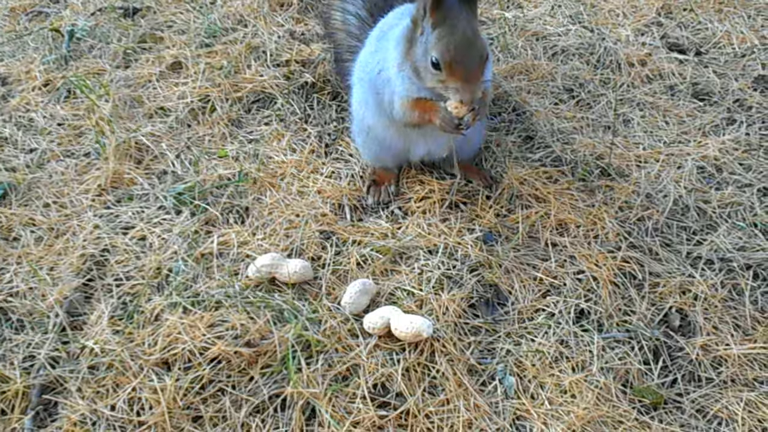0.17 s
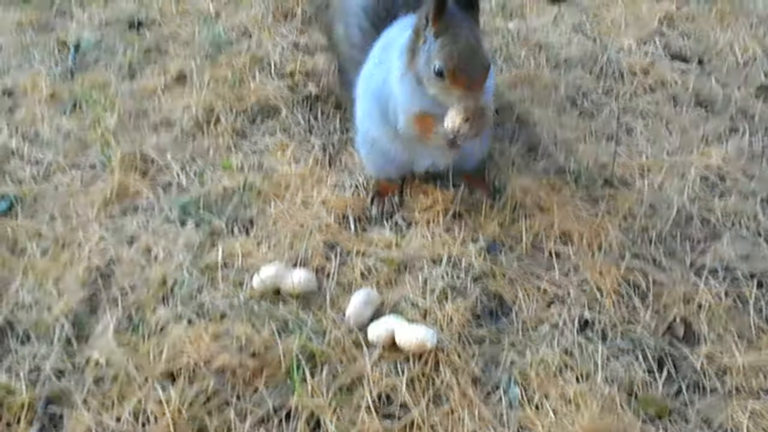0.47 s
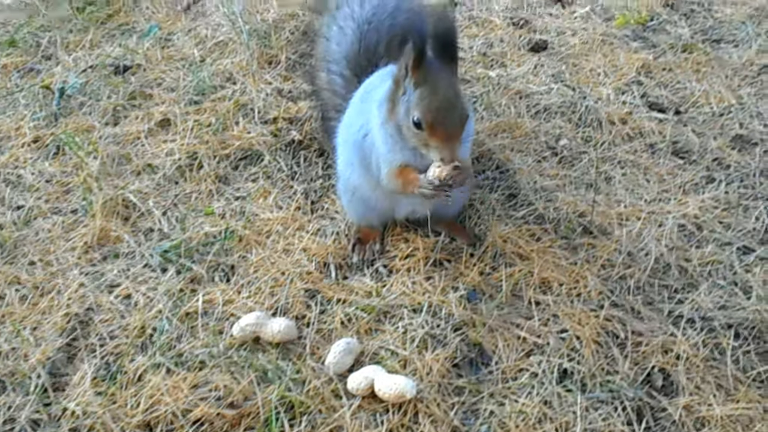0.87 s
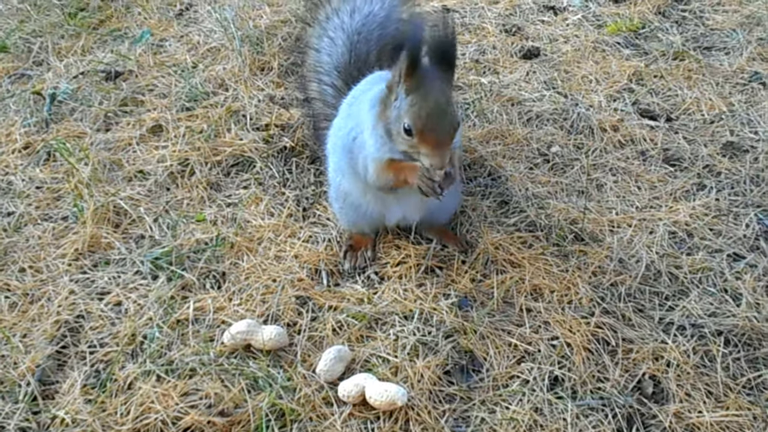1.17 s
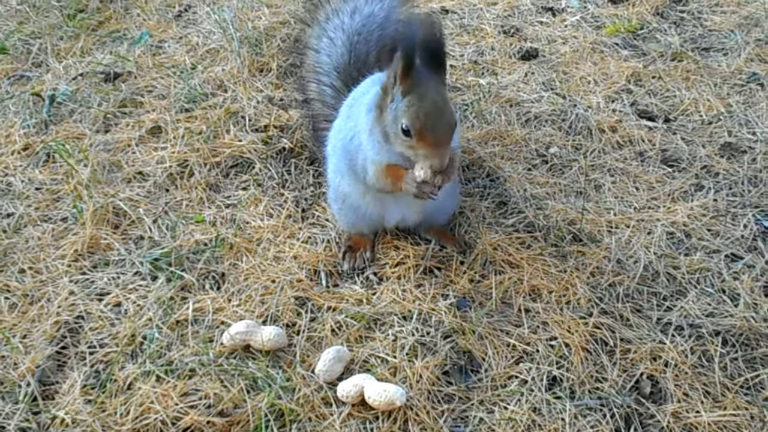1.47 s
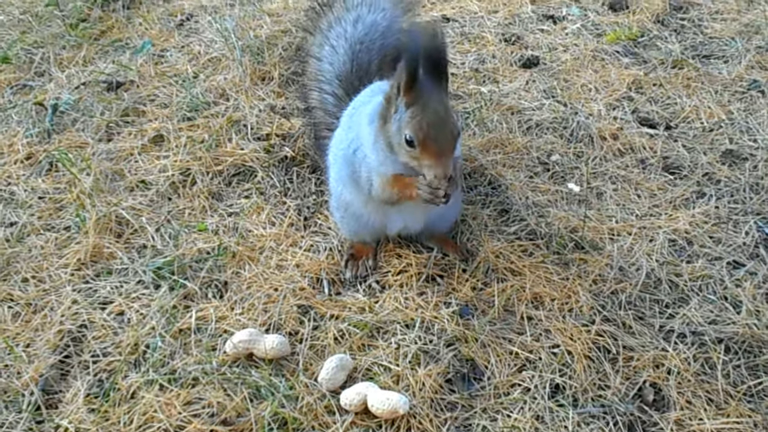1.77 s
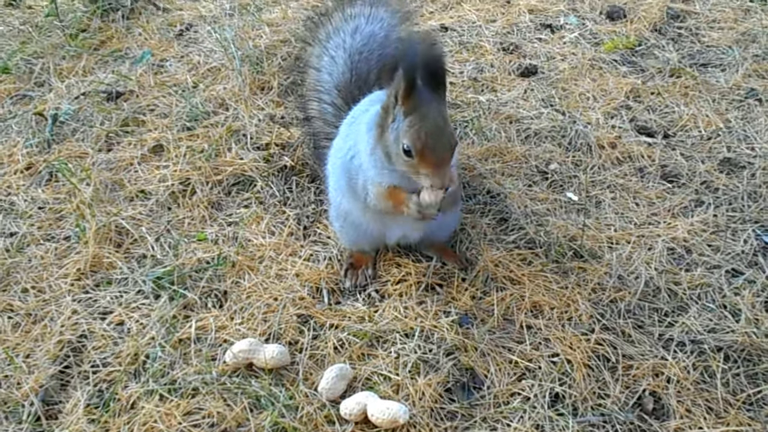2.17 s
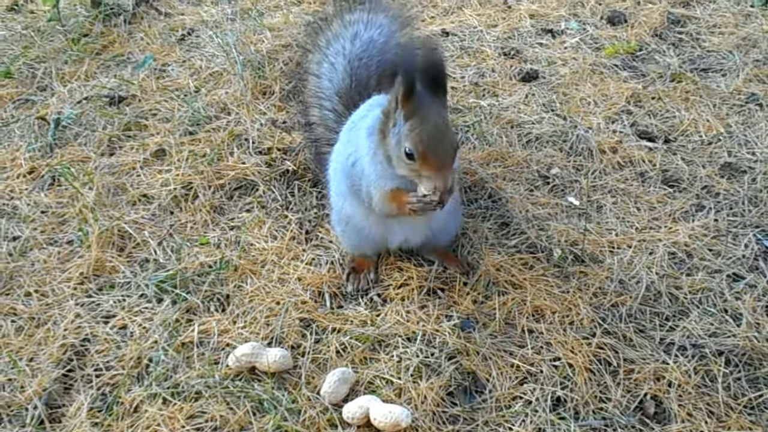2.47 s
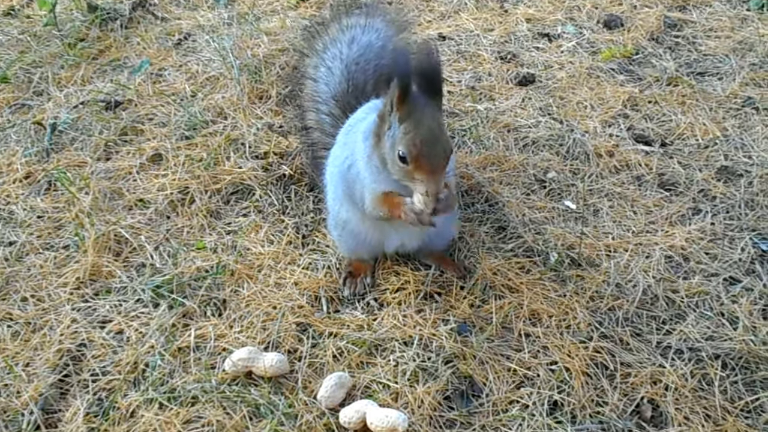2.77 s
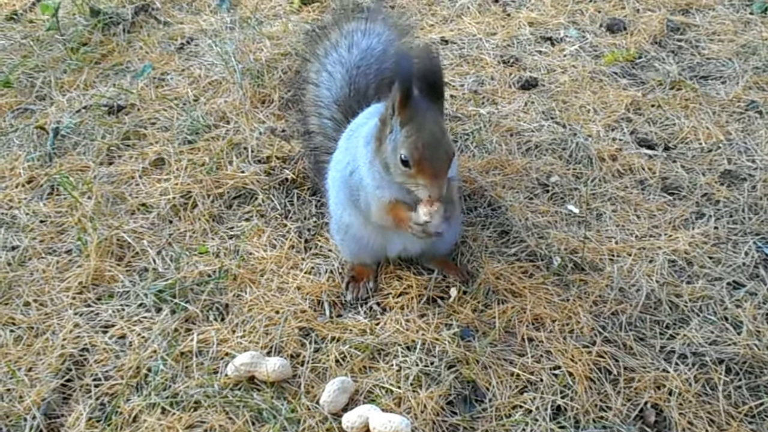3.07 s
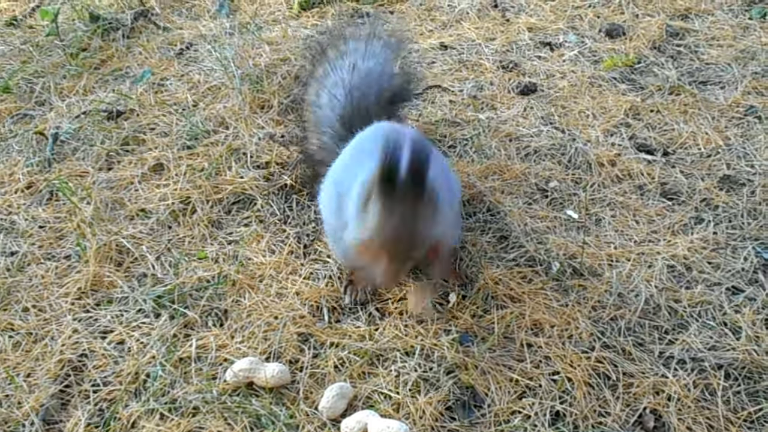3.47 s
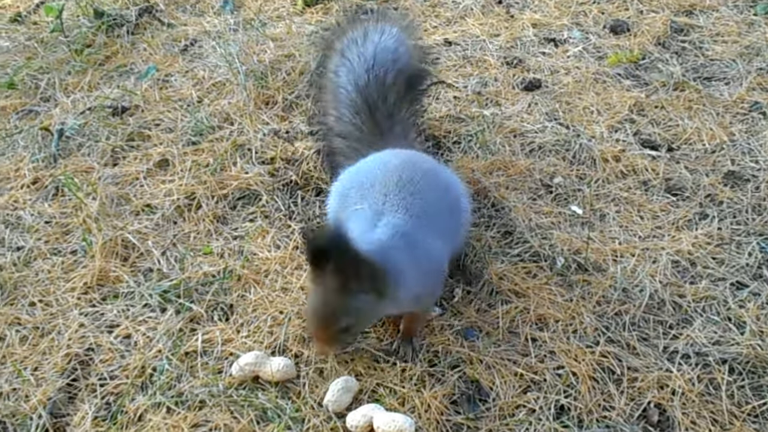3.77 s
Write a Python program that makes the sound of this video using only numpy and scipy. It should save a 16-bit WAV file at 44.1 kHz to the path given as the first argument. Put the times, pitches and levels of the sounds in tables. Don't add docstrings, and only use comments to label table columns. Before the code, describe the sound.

A squirrel gnaws a nut shell in crisp, bright irregular crackles over faint distant traffic.

```python
import sys
import numpy as np
from scipy import signal
from scipy.fft import rfft, irfft, next_fast_len
from scipy.io import wavfile
from scipy.ndimage import uniform_filter1d, map_coordinates

SR = 44100
rng = np.random.default_rng(int(sys.argv[2]) if len(sys.argv) > 2 else 0)


def master_out(mix):
    frames = np.transpose(np.atleast_2d(mix))
    ceiling = np.clip(frames, -1, 1)
    pcm = np.round(ceiling * 32767).astype(np.int16)
    wavfile.write(sys.argv[1], SR, pcm)


def nominal_scale(level):
    x = np.asarray(level, float) / 20
    return 10 ** x


N = 173313

# (time [s], ring level [dB], ring pitch [Hz], snap level [dB], edge level [dB])
EARLY_CRACKS = [(0.0965, -48, 3540, -45.0, -62.5), (0.2497, -33, 3550.0, -33.5, -36.5),
                (0.2539, -30.5, 3170, -31.5, -37), (0.39, -47.5, 2860, -44, -46.5),
                (0.505, -43, 2800.0, -44.5, -47), (0.5331, -25.5, 2850, -23, -30),
                (0.5427, -39.0, 2560, -49, -70), (0.55, -30.5, 2960, -61, -77.0),
                (1.2049, -41, 2930, -43.5, -49), (1.2104, -31.5, 2970, -29, -38),
                (1.2444, -22, 2910, -24, -40.5), (1.2568, -31, 2980, -35, -28),
                (1.265, -42, 3400, -52, -63.0), (1.2746, -36.5, 3020, -45, -53.0),
                (1.3089, -45.0, 4260.0, -43, -56), (1.3149, -34, 3130, -47, -61),
                (1.3182, -42, 2620, -50.5, -53), (1.383, -37, 3320, -41, -37),
                (1.3878, -30, 4240, -26, -35), (1.3901, -26, 3330, -28, -26.5),
                (1.3961, -40, 2860.0, -34, -37), (1.4638, -41.5, 3120.0, -44, -52),
                (1.517, -38, 3340.0, -35, -47), (1.5182, -29.5, 3190.0, -29, -33.0),
                (1.521, -30.5, 2700, -23.5, -36), (1.5273, -44, 3030, -45, -50),
                (1.5452, -27.5, 3330, -28.5, -48), (1.551, -35, 4200, -46, -54),
                (1.5531, -39, 3600.0, -41, -44), (1.5647, -31.5, 3150, -39.5, -44)]
LATE_CRACKS = [(1.8488, -30, 4560, -30, -35.5), (1.8571, -38, 3180, -46, -53.0),
               (1.9127, -38.5, 3400, -40.5, -59), (1.9178, -48, 4290.0, -48, -55),
               (1.9445, -42, 4290.0, -42.5, -50), (1.9554, -30.5, 3230, -30, -41.0),
               (1.9612, -32, 3300, -32, -42), (1.9709, -32.5, 4200, -19.5, -28.5),
               (1.9751, -36.5, 3250, -39, -47), (2.0856, -36.5, 3450, -43, -47),
               (2.1016, -26.5, 3320.0, -27.5, -43), (2.1069, -28.5, 3160, -58, -65.0),
               (2.1171, -42.5, 3100.0, -49, -59), (2.1982, -43, 3000, -56, -74),
               (2.4196, -24, 3260, -28.5, -23.5), (2.4239, -35, 3700.0, -34.5, -32),
               (2.4292, -42, 3400, -38, -54), (2.431, -33, 3600, -24, -29), (2.5225, -48.0, 3440, -47, -44),
               (2.5279, -36, 4290.0, -37, -58), (2.5329, -27.0, 3160, -26, -29.0),
               (2.5408, -29.5, 4010, -32.5, -36), (2.586, -27, 3190, -24.5, -38.5),
               (2.592, -42, 4290.0, -43, -51), (2.5944, -33.5, 4080, -34, -31.5),
               (2.6197, -44, 4160.0, -41.5, -51.0), (2.7763, -46, 2670.0, -46, -84.5),
               (3.0113, -37.5, 2800, -53, -70.5)]
EXTRA_CRACKS = [
    (1.3894, -27, 3100, -28, -36),
    (1.5433, -33, 3400, -33, -46),
    (1.5495, -44, 3600, -43, -44),
]
# (time [s], ring level [dB], snap level [dB])
EARLY_TICKS = [(0.0948, -75, -69.5), (0.106, -76, -68.5), (0.1192, -71, -61.0), (0.1234, -63, -53),
               (0.1274, -47, -54), (0.1427, -57, -54), (0.1824, -77, -70), (0.2149, -65, -54),
               (0.2178, -68.0, -59.5), (0.26, -56.5, -64.5), (0.2638, -78.5, -71), (0.2771, -59, -61),
               (0.3575, -51.5, -45), (0.395, -54, -61), (0.4605, -54.5, -74), (0.475, -54.5, -71),
               (0.498, -44, -54), (0.51, -70, -52), (0.5233, -49, -56), (0.5397, -51, -67),
               (0.5643, -73.5, -62), (0.7686, -53, -71.5), (0.948, -75.5, -62.5), (0.9502, -75.0, -58),
               (1.0217, -58.0, -61), (1.0329, -54, -78.5), (1.0555, -59, -70), (1.0579, -55.5, -70),
               (1.0653, -46.5, -56.5), (1.066, -56, -53), (1.0696, -49.5, -55), (1.144, -60, -63),
               (1.1803, -45.5, -48.5), (1.2217, -54, -48), (1.2276, -53.0, -51), (1.2495, -51, -50),
               (1.2616, -50, -39), (1.298, -52.0, -64), (1.3117, -49.0, -44)]
LATE_TICKS = [(1.3616, -51, -61), (1.467, -55, -55.5), (1.4688, -52.5, -50.5), (1.5058, -45.0, -50),
              (1.5553, -53.0, -44.5), (1.56, -50, -44), (1.595, -57.0, -49), (1.6165, -58, -65),
              (1.7425, -58, -55), (1.747, -57.0, -52.5), (1.7843, -57, -54), (1.7912, -70.5, -55.0),
              (1.7972, -64.0, -57.0), (1.808, -52, -51.0), (1.8267, -62, -51.0), (1.8283, -63, -49),
              (1.907, -59, -49), (1.98, -47, -61), (2.0586, -61.5, -51), (2.066, -53, -52),
              (2.0688, -60.0, -53.0), (2.0707, -50.0, -57.5), (2.078, -54.5, -50), (2.0827, -52, -43.5),
              (2.0883, -41, -52), (2.0915, -47, -51.5), (2.1246, -44, -55), (2.5134, -56.5, -50),
              (2.5265, -42, -43), (2.5315, -57, -50), (2.537, -49, -53), (2.5674, -50, -45),
              (2.5766, -42, -42), (2.778, -42.5, -62), (3.2825, -69, -58), (3.578, -61, -55),
              (3.5813, -59, -50), (3.5834, -66, -58), (3.5876, -64, -57)]
# (frequency [Hz], level [dB])
SNAP_MODES = [(4900, 1), (5900, 3), (7300, 6.5)]
# (low [Hz], high [Hz])
CRACK_BANDS = [(1800, 4600), (4000, 8200), (8200, 13000)]
# (time [s], level [dB], pitch [Hz])
SHELL_SPLITS = [
    (.2541, -32, 1750),
    (2.4192, -27, 1400),
    (2.4303, -29, 1000),
]
# (frequency [Hz], gain [dB])
SHELL_RADIATION = [(400, -30), (1500, 0)]
# (time [s], level [dB])
NIBBLE_LEVEL = [(.07, -67), (.5, -63.5), (.62, -68), (1.0, -73), (1.3, -57), (1.62, -70), (1.68, -78),
                (1.8, -62.5), (2.1, -53.5), (2.25, -75), (2.55, -65), (2.7, -72), (3.2, -64.5), (3.93, -63)]
# (time [s], swell length [s], level [dB])
PAW_RUSTLES = [
    (0.76, 0.014, -64.5),
    (1.748, 0.005, -62),
    (3.159, 0.016, -59),
    (3.345, 0.0089, -62),
    (3.508, 0.018, -67),
    (3.582, 0.0072, -59),
]
# (frequency [Hz], gain [dB])
GRASS_COLOUR = [(1500, -17), (2500, 1), (5000, -1.5), (9500, -11), (12000, -7)]
# (time [s], level [dB])
TRAFFIC_LEVEL = [(0, -52.5), (1, -53), (2, -51), (3, -50.5), (3.93, -50)]
# (frequency [Hz], gain [dB])
HUM_COLOUR = [(20, -49), (260, -7), (600, -5), (1000, -1), (1600, -8), (2100, -21.5), (4400, -31.5),
              (13000, -48)]
# (time [s], level [dB])
PASSING_LEVEL = [
    (0, -85),
    (1.2, -72.5),
    (1.9, -66.5),
    (2.15, -64),
    (2.3, -58),
    (2.55, -60.5),
    (2.85, -60),
    (3.12, -61),
    (3.4, -68),
    (3.93, -66),
]
# (frequency [Hz], gain [dB])
TYRE_COLOUR = [(900, -17), (1500, 1.5), (4500, -3), (8000, -15.5), (13000, -26)]
# (frequency [Hz], gain [dB])
WIND_COLOUR = [(15, -5), (60, -2.5), (200, 1), (500, -35.5)]
# (frequency [Hz], gain [dB])
MIC_RESPONSE = [(9700, 0), (10200, -8), (10600, -38), (11900, -21), (12700, -42), (14000, -66)]

RING_T60_S, RING_RISE_S, SNAP_T60_S, SNAP_RISE_S = 0.0048, 0.0002, 0.003, 0.0001
RING_DB, SNAP_DB, EDGE_DB, THUD_DB = -1.5, -2, 0.5, -20
TICK_HZ, TICK_EDGE_DB, TICK_DB, TICK_T60_S = 3180, -7.5, -2, 0.0071
EDGE_HZ = 9940
CRUMBLE_DB, CRUMBLE_T60_S = -9, 0.012
LEAD_S = 0.0006
DULLING = 0.2
CLICK, SCATTER_DB = 4, 2.5
BIRD_S, BIRD_LEN_S, BIRD_DB = 2.916, 0.158, -66.5
BIRD_END_HZ, BIRD_FALL_HZ, BIRD_FALL_S, BIRD_SAG_HZ_PER_S = 6810, 480, 0.018, 2750
TYRE_SWAY_DB, WIND_DB, HISS_DB = 1.2, -69.5, -98.5
OPEN_S, OPEN_DB, SETTLE_S = 0.0732, -13, 0.18
OPEN_STEP, OPEN_STEP_S = 0.002, 0.001


def cracks():
    ticks = [(s, db, TICK_HZ * (1 + 0.092 * rng.standard_normal()), snap_db, snap_db + TICK_EDGE_DB)
             for s, db, snap_db in EARLY_TICKS + LATE_TICKS]
    events = np.array(EARLY_CRACKS + LATE_CRACKS + EXTRA_CRACKS + ticks)
    s, ring_db, hz, snap_db, edge_db = events.T[:, :, None]
    t = np.arange(1536) / SR
    luck = rng.standard_normal((len(s), 12))
    noise = rng.standard_normal((4, len(s), len(t)))
    grain = nominal_scale(TICK_DB - 60 * t / TICK_T60_S) * noise
    contact = CLICK * (t == 0)

    thud_hz = 1500 * (1 + 0.14 * luck[:, 10:11])
    thud = nominal_scale(THUD_DB + 2 * luck[:, 9:10]) * ring(t, thud_hz, RING_T60_S, RING_RISE_S)
    body = ring(t, hz, RING_T60_S, RING_RISE_S) + 0.5 * grain[0] + thud + contact

    blunt_db = DULLING * np.minimum(edge_db - snap_db, 0)
    snap = 1.3 * nominal_scale(2 * blunt_db) * grain[1] + nominal_scale(blunt_db) * contact
    for k, (mode_hz, db) in enumerate(SNAP_MODES):
        mode_gain = nominal_scale(db + k * blunt_db + SCATTER_DB * luck[:, k:k + 1])
        tuned_hz = mode_hz * (1 + 0.073 * luck[:, k + 4:k + 5])
        snap = snap + mode_gain * ring(t, tuned_hz, SNAP_T60_S, SNAP_RISE_S)

    edge_hz = EDGE_HZ * (1 + 0.04 * luck[:, 3:4])
    edge = 1.14 * grain[2] + ring(t, edge_hz, SNAP_T60_S, SNAP_RISE_S)

    levels = nominal_scale([ring_db + RING_DB, snap_db + SNAP_DB, edge_db + EDGE_DB])
    blow = sum(g * banded(part, band) for g, part, band in zip(levels, [body, snap, edge], CRACK_BANDS))
    grit = nominal_scale(4 * np.repeat(rng.standard_normal((len(s), 48)), 32, 1))
    crumbs = sum(g * banded(noise[3], band) for g, band in zip(levels, CRACK_BANDS))
    tail = crumbs * nominal_scale(CRUMBLE_DB - 60 * t / CRUMBLE_T60_S) * grit
    return laid(s[:, 0] - LEAD_S, blow + tail)


def splits():
    s, db, hz = np.transpose(SHELL_SPLITS)[:, :, None]
    return laid(s[:, 0], nominal_scale(db) * ring(np.arange(512) / SR, hz, RING_T60_S, RING_RISE_S))


def nibbling(count=700):
    luck = rng.random((count, 3))
    t = np.arange(128) / SR
    s = luck[:, 0] * (N - 1) / SR
    strength_db = curve(NIBBLE_LEVEL)[(s * SR).astype(int)]
    size = nominal_scale(strength_db - 4.4 * np.log(luck[:, 1] + 0.12))[:, None]
    grit = np.diff(rng.standard_normal((count, len(t))), prepend=0) * nominal_scale(-60 * t / TICK_T60_S)
    hz = 2500 * 3.2 ** luck[:, 2:] ** 2
    return laid(s, size * (ring(t, hz, 0.0051, 0.0001) + 0.21 * grit))


def rustles():
    t = np.arange(N) / SR
    swell = sum(nominal_scale(db) * np.exp(-0.5 * ((t - s) / length) ** 2) for s, length, db in PAW_RUSTLES)
    return swell * unit(nominal_scale(2.6 * wobble(400)) * rush(GRASS_COLOUR, patchy_db=0.0))


def bird():
    t = np.clip(np.arange(N) / SR - BIRD_S, 0, BIRD_LEN_S)
    drop_hz = BIRD_FALL_HZ * np.exp(-t / BIRD_FALL_S)
    hz = BIRD_END_HZ + drop_hz + BIRD_SAG_HZ_PER_S * (BIRD_LEN_S - t)
    swell = np.abs(np.sin(np.pi * np.sqrt(t / BIRD_LEN_S))) ** 0.4 * (t < BIRD_LEN_S)
    return nominal_scale(BIRD_DB + wobble(60)) * swell * np.sin(2 * np.pi * np.cumsum(hz) / SR)


def traffic():
    hum_db = curve(TRAFFIC_LEVEL) + 0.12 * wobble(3.53) + 0.53 * wobble(9.5)
    hum = nominal_scale(hum_db) * rush(HUM_COLOUR, patchy_db=-0.68)
    tyre_db = curve(PASSING_LEVEL) + TYRE_SWAY_DB * wobble(5.73)
    return hum + nominal_scale(tyre_db) * rush(TYRE_COLOUR, patchy_db=0.6)


def wind():
    return nominal_scale(WIND_DB + wobble(2.2)) * rush(WIND_COLOUR, patchy_db=-0.5)


def ring(t, hz, t60, rise):
    shape = nominal_scale(-60 * t / t60) * (1 - np.exp(-t / rise))
    return shape / shape.max() * np.sin(2 * np.pi * hz * t)


def banded(rows, edges):
    rows = signal.sosfilt(signal.butter(3, edges, "bandpass", fs=SR, output="sos"), rows)
    return rows / np.sqrt(uniform_filter1d(rows ** 2, size=24, axis=1).max(1, keepdims=True))


def laid(times, rows):
    at = np.round(times * SR).astype(int)[:, None] + np.arange(rows.shape[1])
    return np.bincount(at.ravel(), rows.ravel(), N + SR)[:N]


def unit(x):
    return x / np.sqrt(np.mean(x ** 2) + 1e-20)


def curve(rows):
    return np.interp(np.arange(N) / SR, *np.transpose(rows))


def wobble(rate):
    knots = rng.standard_normal(int(N * rate / SR) + 4)
    return map_coordinates(knots, [np.arange(N) * rate / SR])


def coloured(x, points, causal=False):
    m = 2 * next_fast_len(N // 2 + 4096)
    f, v = np.transpose(points)
    log_hz = np.log(np.fft.rfftfreq(m, 1 / SR) + 1)
    gain = np.interp(log_hz, np.log(f + 1), v) * np.log(10) / 20
    if causal:
        cepstrum = irfft(gain, m)
        gain = rfft(cepstrum * np.r_[1, np.full(m // 2 - 1, 2), 1, np.zeros(m // 2 - 1)])
    return irfft(rfft(x, m) * np.exp(gain), m)[:N]


def rush(points, patchy_db):
    z = signal.stft(rng.standard_normal(N + 512), nperseg=512)[2]
    field = uniform_filter1d(uniform_filter1d(rng.standard_normal(z.shape), 8, 0), 10, 1)
    noise = signal.istft(z * nominal_scale(patchy_db * unit(field)), nperseg=512)[1][:N]
    return unit(coloured(noise, points))


def scene():
    t = np.arange(N) / SR - OPEN_S
    rise = nominal_scale(OPEN_DB * np.exp(-(np.abs(t) / SETTLE_S) ** 2))
    shell = coloured(cracks() + splits(), SHELL_RADIATION, causal=True)
    open_tick = OPEN_STEP * np.exp(-np.abs(t) / OPEN_STEP_S)
    background = rise * (nibbling() + rustles() + bird() + traffic())
    return (shell + open_tick + background + np.sqrt(rise) * wind())[None]


def top_cut(x):
    return signal.sosfilt(signal.butter(12, 13200, fs=SR, output="sos"), x)


def record(dry):
    opened = np.arange(N) / SR > OPEN_S
    heard = coloured(dry[0] * opened, MIC_RESPONSE, causal=True)
    hiss = opened * nominal_scale(HISS_DB) * rng.standard_normal(N)
    mix = (heard + hiss)[None]
    return top_cut(mix)


dry = scene()
out = record(dry)
master_out(out)
```